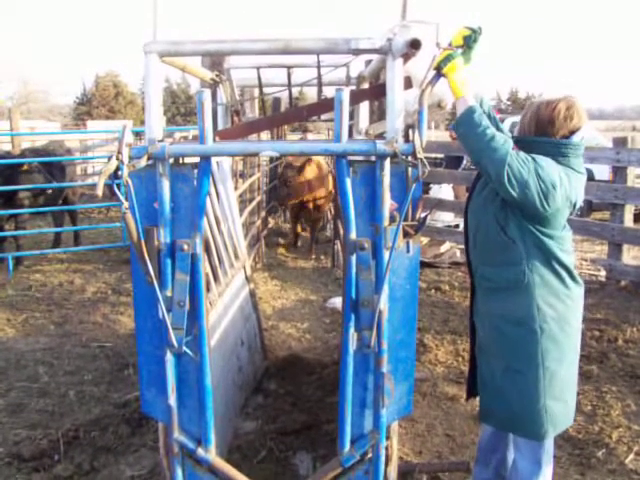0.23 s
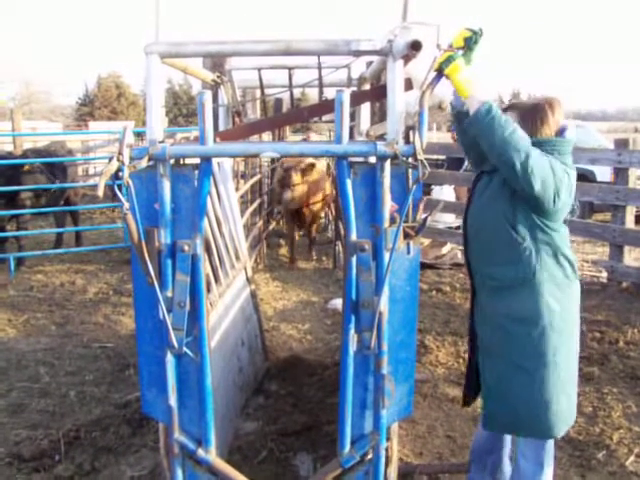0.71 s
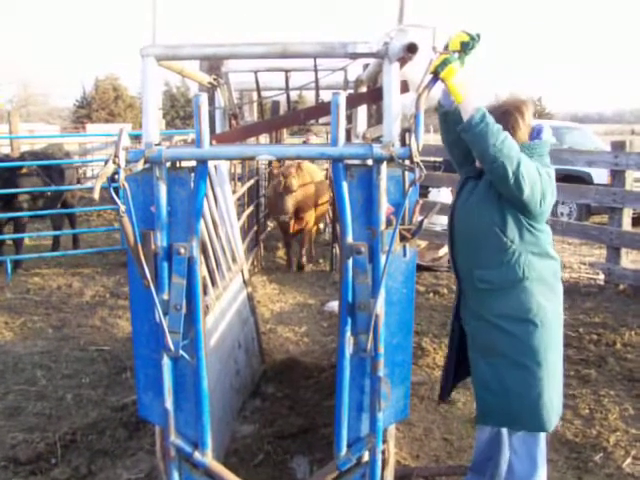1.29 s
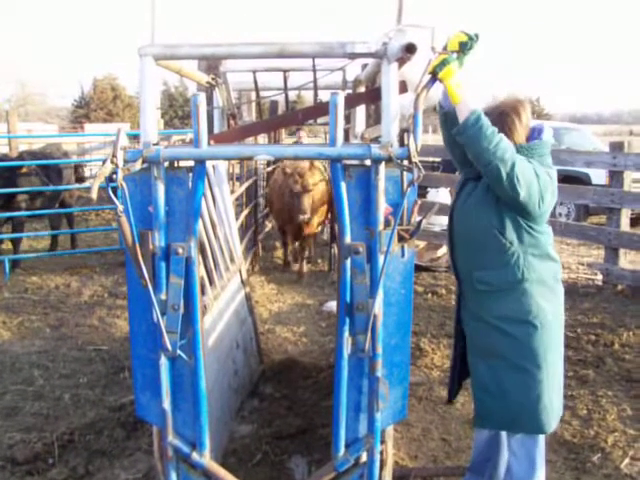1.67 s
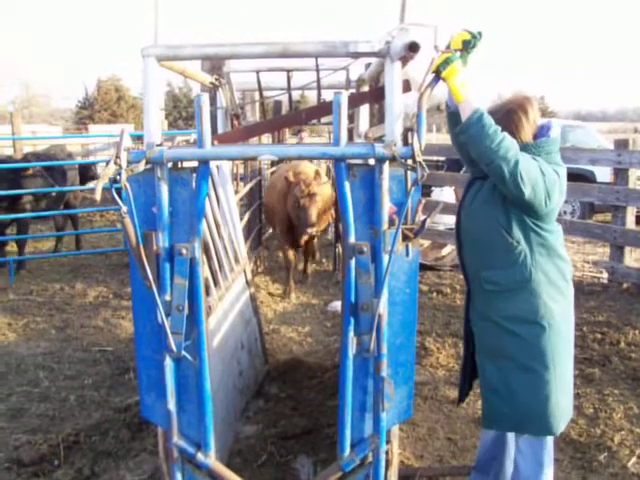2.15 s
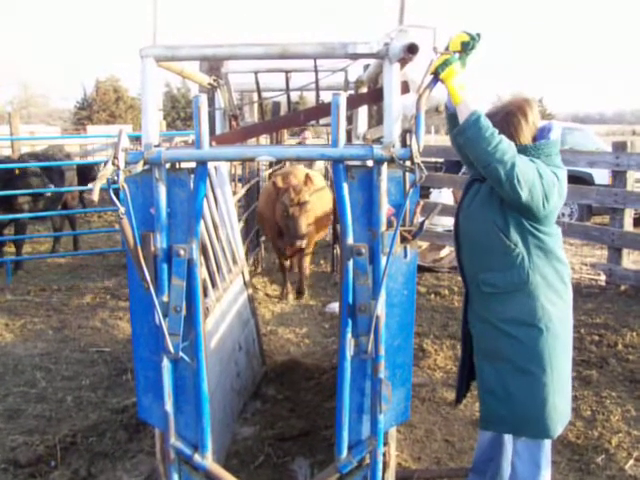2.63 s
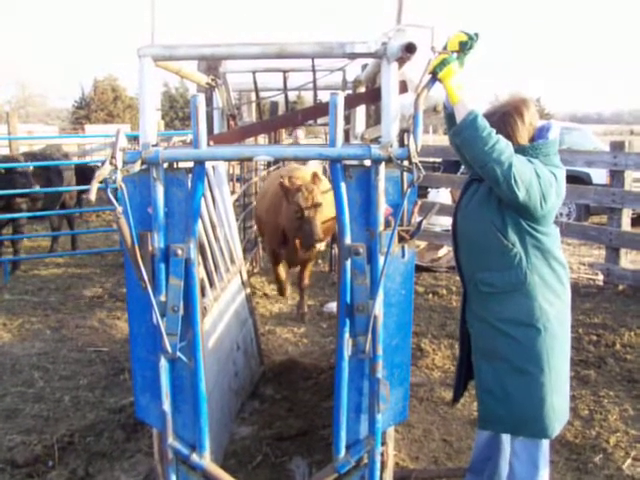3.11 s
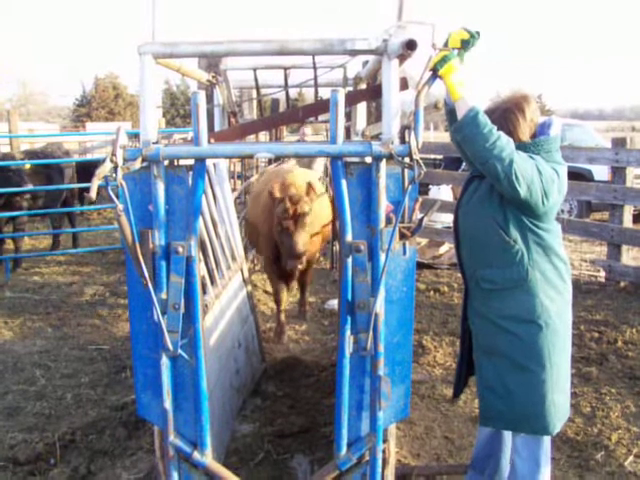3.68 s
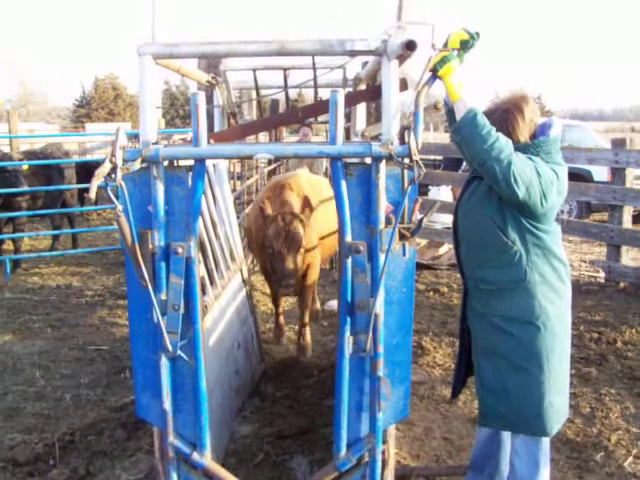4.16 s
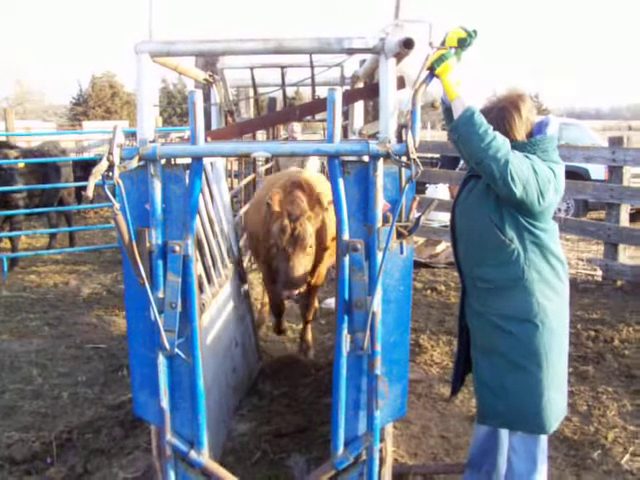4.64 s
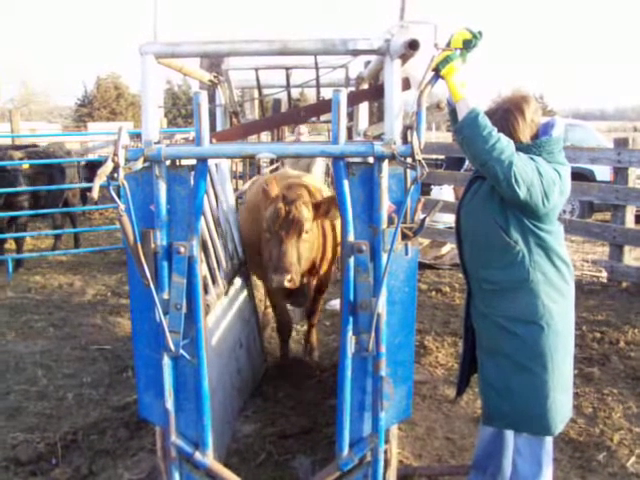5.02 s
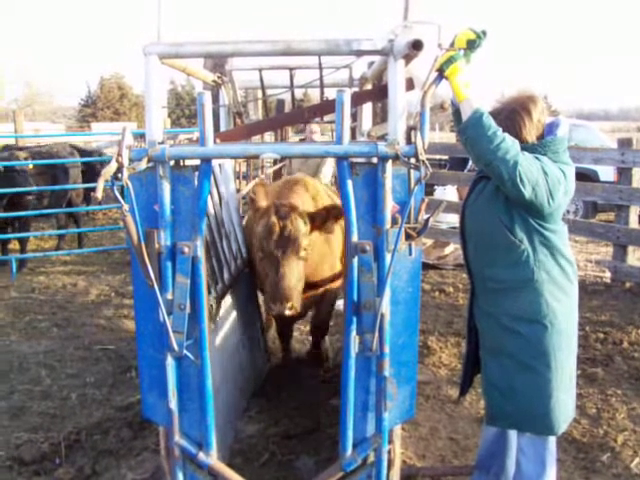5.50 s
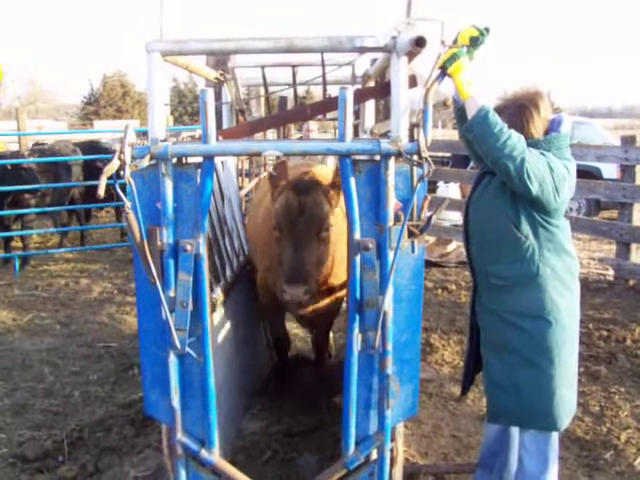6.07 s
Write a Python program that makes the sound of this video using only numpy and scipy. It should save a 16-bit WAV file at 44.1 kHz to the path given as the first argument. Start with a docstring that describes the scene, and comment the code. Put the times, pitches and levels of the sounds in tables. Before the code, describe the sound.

Cattle calling at a steel chute outdoors, dry with short scattered yard echoes. A low pulsing growl rises slowly to a nasal, raspy moo, then breaks suddenly into a clear high cry that slides down. Light latch clinks dot the call. Then sharp cracks with dull thuds and panel rattle hit the chute, overlapping a rough second moo with an arched pitch. A wind gust buffets the microphone late, and sharp clanks finish.

```python
"""Metal parts clink under a faint outdoor hiss and light wind; then cattle bawl as a cow enters a steel chute.
A long call climbs from a creaky growl to a moo, breaks into a high register and falls; a second moo follows.
Each voice is a harmonic series and puffs of breath noise filtered by throat resonances, with a nasal hum.
Chute blows are filtered snaps and noise bursts that excite the frame's decaying modes.
Hiss and wind are shaped noise, distant squeaks are gliding sines, and sparse echoes make the yard."""
import sys
import numpy as np
from scipy import signal
from scipy.fft import irfft
from scipy.io import wavfile
from scipy.ndimage import uniform_filter1d

SR = 44100
rng = np.random.default_rng(int(sys.argv[2]) if len(sys.argv) > 2 else 0)


def materialize(psi):
    """Save the field psi as 16-bit PCM at rate SR to the path in sys.argv[1].

    A 1-D psi becomes a single channel; in a 2-D psi each row is a channel.
    """
    bounded = np.clip(np.atleast_2d(psi).T, -1, 1)
    quanta = np.round(bounded * 32767).astype(np.int16)
    wavfile.write(sys.argv[1], SR, quanta)


N = 276948
EDGE_HZ = 8600  # upper band limit of the sound
SIZE = 8192  # samples in a filter's spectrum
GRID = np.fft.rfftfreq(SIZE, 1 / SR)  # Hz
TIME = np.arange(N) / SR  # s

# outdoor hiss, relative spectral density: hz, level_db
AIR = [(25, -14.5), (70, -4), (150, -6.5), (230, -10.5), (620, -13.5), (1200, -23), (2200, -22.5),
       (3650, -18), (4900, -23), (8100, -30.5), (8800, -61.5)]
AIR_DB, CALM_DB = -51.5, -61.5  # mean levels of the hiss and of the wind between gusts
# gusts of wind on the microphone: centre_s, width_s, rise_db
GUSTS = [(1.7, 0.88, 7), (5.64, 0.48, 17)]
# decay of the yard's scattered sound: hz, t60_s
YARD_T60 = [(100, 0.72), (1000, 0.12), (4000, 0.42), (8000, 0.023)]
# thin distant squeaks, direct sound: start_s, length_s, pitch_hz, peak_db
SQUEAKS = [(0.038, 0.051, 5600, -55), (0.6, 0.076, 4680, -60)]

# modes of the steel frame, relative levels: mode_hz, level_db, t60_s
STEEL = [(254, -2.5, 0.11), (396, 6.5, 0.02), (624, -22, 1.0), (1000, -5.5, 0.047), (1463, -7, .25),
         (1796, -6, 0.21), (2420, -18, 0.44), (3200, -16, 0.44), (3740, -24, .15), (4044, -11.5, 0.28),
         (4963, -10, .3)]
RING_DB, CONTACT_SKIRT_DB = -44, -9  # scale of the frame's ring; skirt beside a contact's spectral peak
# the cow bumps the chute: start_s, crack_db, crack_hz, crack_spread_octaves,
# thud_db, thud_hz, thud_delay_s, rattle_db (peak levels)
BLOWS = [(4.886, -7.5, 4150, 0.17, -6, 410, 0.0079, -26), (5.159, -24.5, 2630, 1.48, -29, 131, 0.0076, -43),
         (5.196, -28.5, 3000, 1.1, -42, 200, 0.0013, -47), (5.544, -7.5, 1700, 1.03, -19.5, 500, .009, -34),
         (5.899, -18, 980, 1.3, -31, 500, 0.0071, -27.5), (6.087, -3.5, 1040, 0.2, -10, 333, 0.00097, -23)]
BODY_DB = -10.5  # the frame's broad knock, relative to each crack
REBOUND_S, REBOUND_GROWTH, REBOUND_LOSS_DB = .022, 2.7, -2  # first delay, delay ratio, level step
# clinks of latches and chains: start_s, peak_db, centre_hz, spread_octaves, t60_s
CLINKS = [(.027, -38.5, 2700, .69, 0.027), (.047, -40.5, 3800, 0.15, 0.42),
          (.295, -35.5, 5000, 0.25, 0.089), (.316, -33.5, 4800, 0.36, 0.12),
          (1.023, -23.5, 5040, 0.78, 0.019), (1.57, -21, 4700, 0.42, .012), (2.548, -26, 3000, 1.05, .012),
          (4.366, -31, 3330, 0.27, .03), (4.963, -30, 6400, 0.36, .03), (5.426, -26, 6660, 0.098, 0.019),
          (6.241, -13, 4770, 0.36, .09), (6.245, -5.5, 3530, 0.12, 0.13), (6.27, -11.5, 3600, 0.55, .09)]

# contours of the climbing moo and the high bawl, before each voice's own offsets:
# time_s, pitch_hz, tone_db (open mouth), rasp_db
MOO = [(1.74, 83.2, -49, -39), (1.854, 96.6, -44.5, -31.5), (1.944, 104.6, -44.5, -31),
       (2.054, 110.6, -46, -40), (2.252, 116.4, -46, -43.5), (2.578, 121.3, -45.5, -41),
       (2.826, 129.4, -44.5, -37.5), (3.168, 144.7, -42, -33), (3.52, 187.5, -38, -39.5),
       (3.586, 189.6, -37, -42.5), (3.658, 199.2, -37.5, -42), (3.72, 223, -39.5, -42.5)]
BAWL = [(3.708, 361, -38.5, -44.5), (3.768, 381, -26.5, -39), (3.852, 388, -27.5, -37.5),
        (3.962, 374.4, -23.5, -39.5), (4.044, 357.5, -25, -37.5), (4.096, 338.2, -27, -37.5),
        (4.112, 309.3, -30, -34.5), (4.144, 254, -33, -40), (4.192, 190.2, -37.5, -48.5),
        (4.225, 185, -51, -51)]
# throat and nose resonances of each register, before stretching: centre_hz, half_width_hz, level_db
GROWL_THROAT = [(680, 135, -5.5), (1360, 250, -10.5), (2080, 69, -21), (2770, 51, -5.5), (3420, 510, -17.5),
                (4044, 185, -3), (5000, 160, -18), (5860, 440, -18)]
MOO_THROAT = [(757, 65, -11), (1130, 240, -10), (1522, 147, -6), (1911, 109, -8.5), (3064, 272, -5.5),
              (3740, 225, 2.5), (4160, 94, -5.5), (5030, 280, -10), (5746, 720, -14.5), (400, 300, -21.5)]
BAWL_THROAT = [(752, 80, -2), (1060, 64, -0.5), (1336, 140, -8), (1740, 207, -10), (2603, 41, -22),
               (3420, 580, -15.5), (3980, 88, -15.5), (5060, 820, -25)]
CROAK_THROAT = [(663, 110, 6.5), (1370, 460, 0.5), (2363, 80, 0.5), (3000, 120, -6), (3400, 240, -10),
                (4000, 180, -5), (5260, 1600, -19.5)]
SECOND_THROAT = [(756, 70, 1), (1056, 140, 2), (1429, 54, 0.5), (1700, 95, 4.5), (2434, 87, -9),
                 (3182, 77, -3), (3680, 97, -2), (5200, 103, -9), (2800, 3500, -17)]
# catches of the throat in the croak, each a jump that dies away: time_s, jump_db
CATCHES = [(5.257, 4), (5.293, 14), (5.362, 4)]
CATCH_S = 0.019  # decay time of a catch
# hum of the two lowest harmonics through the nose, before each voice's offsets: hz, level_db
NOSE = [(95, -8), (120, 3), (150, -3), (180, 5.5), (205, 11), (280, 10), (360, -15.5), (450, -33)]
HUM_TRADE = 0.63  # dB of hum lost for each dB that the rasp gains on the tone as the mouth opens
SNAP_HZ = 4900  # a sharper snap of the folds lifts the spectrum above this
GROUND_S, GROUND_DB = 0.002207, -20.5  # delay and level of the ground echo
SMEAR_S = .0014  # how much later EDGE_HZ leaves the long muzzle than the lowest frequencies


def gain_of(db):
    """Logarithmic level: decibels to amplitude ratio."""
    return 10 ** (np.asarray(db) / 20)


def evened(x):
    """Normalisation: scales a signal to rms 1."""
    return x / np.sqrt(np.mean(x ** 2) + 1e-20)


def steadied(x, size=1300):
    """Envelope flattening: division by the running rms holds it near 1."""
    power = uniform_filter1d(uniform_filter1d(x ** 2, size), size)
    return x / np.sqrt(abs(power) + 1e-14)


def read(points, hz):
    """Spectral interpolation: joins a table's points on a log-frequency axis."""
    f, value = np.transpose(points)
    return np.interp(np.log(hz + 1), np.log(f + 1), value)


def follow(rows, t):
    """Contour interpolation: every column of a timed table at times t."""
    s, *columns = np.transpose(rows)
    return [np.interp(t, s, c) for c in columns]


def add(mix, s, sound):
    """Superposition: adds a sound to the mix from time s."""
    part = mix[round(s * SR):][:len(sound)]
    part += sound[:len(part)]


def cut(x, hz, kind, order=4):
    """Butterworth filtering: low-pass or high-pass."""
    return signal.sosfilt(signal.butter(order, hz, kind, fs=SR, output="sos"), x)


def drift(length, hz):
    """Random modulation: noise low-passed at hz, rms 1."""
    return evened(cut(rng.standard_normal(length + SIZE), hz, "low", order=2)[SIZE:])


def causal(gain):
    """Minimum phase: the response on GRID of a body with this gain that rings only after it is struck."""
    log_gain = np.log(np.maximum(gain, 1e-5))
    both_sides = np.r_[log_gain, log_gain[-2:0:-1]]
    return np.exp(np.conj(signal.hilbert(both_sides)))[:len(GRID)]


def colour(x, response):
    """Convolution: passes x through a body with this response on GRID."""
    return signal.fftconvolve(x, irfft(response)[:SIZE // 2])[:len(x)]


def since(t, fade_s):
    """Exponential relaxation: falls from 1 at the start of a call."""
    return np.exp((t[0] - t) / fade_s)


def towards(t, swell_s):
    """Exponential growth: climbs to 1 at the end of a call."""
    return np.exp((t - t[-1]) / swell_s)


def yard(x):
    """Multiple scattering: rails, boards and ground return sparse echoes that die at frequency-dependent rates."""
    t = np.arange(SR // 2) / SR
    sparse = rng.random(len(t)) < 1500 / SR
    early = 1 + 7.0 * np.exp(-t / 0.0045)
    taps = rng.standard_normal(len(t)) * sparse * (t > .002) * early
    hz, s, z = signal.stft(taps, SR, nperseg=256)
    decay = gain_of(-60 * s / read(YARD_T60, hz)[:, None])
    tail = signal.istft(z * decay, SR, nperseg=256)[1]
    return signal.fftconvolve(x, tail / np.linalg.norm(tail))[:len(x)]


def outdoors():
    """Broadband turbulence: a faintly wavering hiss, and lumpy low wind noise on the microphone."""
    air = evened(colour(rng.standard_normal(N), causal(gain_of(read(AIR, GRID)))))
    rumble = cut(rng.standard_normal(N), 100, "low", order=2)
    wind = evened(cut(rumble, 35, "high", order=2))
    wind_db = CALM_DB + sum(db * np.exp(-((TIME - s) / width) ** 2) for s, width, db in GUSTS)
    air_gain = gain_of(AIR_DB + 0.22 * drift(N, 16))
    wind_gain = gain_of(wind_db + 4.6 * drift(N, 21))
    return air_gain * air + wind_gain * wind


def squeaks():
    """Frequency modulation: short, slightly wavering whistles from far across the yard."""
    out = np.zeros(N)
    for s, length, hz, db in SQUEAKS:
        swell = np.hanning(round(length * SR))
        turns = np.cumsum(hz * (1 + 0.0033 * drift(len(swell), 80))) / SR
        add(out, s, gain_of(db) * swell * np.sin(2 * np.pi * turns))
    return out + .5 * yard(out)


def hit(peak_db, hz, spread, t60, clatter):
    """Impact excitation: a snap and a decaying clatter, coloured by the part that is struck."""
    t, clatter = np.arange(SR // 4) / SR, np.clip(clatter, 0, 1)
    rattle = rng.standard_normal(len(t)) * gain_of(-60 * t / t60)
    force = (1 - clatter) * (t == 0) + clatter * rattle / np.linalg.norm(rattle)
    octaves = np.log2((GRID + 1) / hz)
    peak = np.exp(-.5 * (octaves / spread) ** 2)
    skirt = gain_of(CONTACT_SKIRT_DB) / (1 + octaves ** 4)
    blow = colour(force, causal(peak + skirt))
    return gain_of(peak_db) * blow / abs(blow).max()


def frame_ring():
    """Modal vibration: the steel frame's impulse response is a sum of decaying sines."""
    t = np.arange(SR) / SR
    return sum(gain_of(db - 60 * t / t60) * np.sin(2 * np.pi * hz * t) for hz, db, t60 in STEEL)


def chute():
    """Impact and resonance: blows crack, thud and rattle, small parts clink, and the frame rings on."""
    out = np.zeros(N)
    for s, crack_db, hz, spread, thud_db, thud_hz, delay_s, rattle_db in BLOWS:
        add(out, s, hit(crack_db, hz, spread, t60=0.027, clatter=0.48))
        add(out, s, hit(crack_db + BODY_DB, hz=900, spread=1.35, t60=.04, clatter=.7))
        add(out, s + delay_s, hit(thud_db, thud_hz, spread=1.32, t60=.036, clatter=0.14))
        for k in range(2):  # loose panels rattle twice after a blow
            rebound_s = s + REBOUND_S * REBOUND_GROWTH ** k
            rebound_db = rattle_db + k * REBOUND_LOSS_DB
            add(out, rebound_s, hit(rebound_db, hz=1450, spread=1.22, t60=0.11, clatter=0.83))
    for s, db, hz, spread, t60 in CLINKS:
        # parts that clatter longer have less snap
        add(out, s, hit(db, hz, spread, t60, clatter=0.51 + 3 * t60))
    out = out + gain_of(RING_DB) * signal.fftconvolve(out, frame_ring())[:N]
    return cut(out + gain_of(-13) * yard(out), 5960, "low", order=3)


def throat_response(throat):
    """Resonance and dispersion: summed throat peaks, with high frequencies leaving the muzzle later."""
    gain = sum(gain_of(db) / (1 + ((GRID - f) / width) ** 2) ** 1.454 for f, width, db in throat)
    # each snap spreads into a short chirp
    return causal(gain) * np.exp(-1j * np.pi * SMEAR_S * GRID ** 2 / EDGE_HZ)


def call(t, hz, throat, tone_db, rasp_db, hum_db, octave_db, rough, jitter, stretch, snap_db, top_hz,
         shimmer, rise_s, fall_s):
    """Source and filter: the folds snap and puff air each cycle into the throat; stretch scales the snaps' resonances."""
    rough = np.clip(rough, 0, 1)
    hz = hz * np.exp(jitter * drift(len(t), 50.6))
    turns = np.cumsum(hz) / SR
    response = throat_response(throat)
    cycle, partial, folds, hum = np.exp(2j * np.pi * turns), 1, 0, 0
    for k in range(1, int(EDGE_HZ / hz.min())):
        partial = partial * cycle
        place = np.rint(k * hz / stretch / GRID[1]).astype(int)
        folds = folds + (partial * response[np.minimum(place, len(GRID) - 1)]).real
        if k <= 2:  # the two lowest harmonics hum through the nose
            nose_gain = gain_of(read(NOSE, k * hz) + (k - 1) * octave_db)
            hum = hum - np.sqrt(2) * partial.real * nose_gain

    puff_shape = .5 + np.exp(-(turns % 1) / 1.3)  # air flow within each cycle
    puffs = colour(puff_shape * rng.standard_normal(len(t)), response)
    clean = steadied(folds) * (1 + shimmer * drift(len(t), 61))
    voice = (1 - rough) * clean + rough * evened(puffs)
    voice = voice + gain_of(GROUND_DB) * np.interp(t - GROUND_S, t, voice)  # the bounce off the ground
    treble = np.convolve(voice, signal.firwin(65, SNAP_HZ, pass_zero=False, fs=SR), "same")
    voice = voice + (gain_of(snap_db) - 1) * treble

    # the open-mouth tone and the rasp above it are levelled separately
    mouth = steadied(cut(cut(voice, 380, "high"), 2470, "low", order=6))
    buzz = steadied(cut(cut(voice, 2470, "high", order=6), top_hz, "low", order=14))
    hum_gain = gain_of(hum_db - HUM_TRADE * (rasp_db - tone_db))
    sound = gain_of(tone_db) * (mouth + hum_gain * hum) + gain_of(rasp_db) * buzz
    ramps = np.minimum((t - t[0]) / rise_s, (t[-1] - t) / fall_s)
    return t[0], sound * np.clip(ramps, 0, 1)


def growl(start_s=1.02, end_s=1.735, first_hz=71.9, settled_hz=78.6, settle_s=.27, tone_db=-54,
          first_rasp_db=-38, fade_db_per_s=-11):
    """Slow fold vibration: a creak that starts with a hum, settles in pitch and loses its rasp."""
    t = np.arange(start_s, end_s, 1 / SR)
    fresh = since(t, settle_s)
    hz = settled_hz + (first_hz - settled_hz) * fresh
    rasp_db = first_rasp_db + fade_db_per_s * (t - start_s)
    return call(t, hz, GROWL_THROAT, tone_db, rasp_db,
                hum_db=-3 + 30 * fresh + 12 * towards(t, .07), octave_db=-2.5, rough=0.19, jitter=.009,
                stretch=1.003 + .04 * fresh, snap_db=1.5 - 8 * fresh,
                top_hz=6700, shimmer=.071, rise_s=0.1, fall_s=0.0084)


def moo(easy_hz=120, strained_hz=200, open_s=0.29, linger_s=.022):
    """Fold tension: after a rough, tight start the climbing voice gets cleaner and darker until it cracks."""
    t = np.arange(MOO[0][0], MOO[-1][0] + linger_s, 1 / SR)  # the low voice lingers under the break
    hz, tone_db, rasp_db = follow(MOO, t)
    strain = np.clip((hz - easy_hz) / (strained_hz - easy_hz), 0, 1)
    tight = since(t, open_s)
    unsteady = since(t, 0.044) + towards(t, .02)
    return call(t, hz, MOO_THROAT, tone_db - 3.5 * unsteady, rasp_db + 2.3 * tight - 4 * unsteady,
                hum_db=.5, octave_db=-5, rough=.06 + .13 * (1 - strain) ** 3 + .1 * unsteady,
                jitter=.0012 + 0.022 * unsteady, stretch=0.961 + 0.093 * tight + 0.066 * strain ** 3,
                snap_db=8.5 - 28 * tight - 13.2 * strain ** 0.35,
                top_hz=7230, shimmer=.04, rise_s=.003, fall_s=0.037)


def bawl(held_hz=350, slack_hz=190):
    """Register break: the high voice is clean while the pitch holds and turns ragged as the folds go slack."""
    t = np.arange(BAWL[0][0], BAWL[-1][0], 1 / SR)
    hz, tone_db, rasp_db = follow(BAWL, t)
    slack = np.clip((held_hz - hz) / (held_hz - slack_hz), 0, 1)
    crack = since(t, 0.027)
    return call(t, hz, BAWL_THROAT, tone_db - 1, rasp_db - 0.9, hum_db=-11 + 2.5 * slack, octave_db=-10,
                rough=.12 + .07 * slack + .15 * crack, jitter=.003 + .06 * slack ** 8 + 0.0287 * crack,
                stretch=1.01 - 0.054 * slack, snap_db=3 - 11 * slack,
                top_hz=5400, shimmer=0.025, rise_s=.014, fall_s=0.013)


def croak(start_s=5.25, end_s=5.42, first_hz=89.9, climb_hz_per_s=295, first_tone_db=-46, first_rasp_db=-43,
          swell_db_per_s=65):
    """Irregular fold vibration: the second call starts as a rattle that swells, speeds up and steadies."""
    t = np.arange(start_s, end_s, 1 / SR)
    age, loose = t - start_s, since(t, 0.18)
    catch_db = sum(db * (t > s) * np.exp(-abs(t - s) / CATCH_S) for s, db in CATCHES)
    swell_db = swell_db_per_s * age
    return call(t, first_hz + climb_hz_per_s * age, CROAK_THROAT,
                first_tone_db + swell_db + 0.34 * catch_db, first_rasp_db + swell_db + catch_db,
                hum_db=-11.5, octave_db=-7.5, rough=0.63 * loose, jitter=.19 * loose,
                stretch=1.03 - .11 * loose, snap_db=-5.0,
                top_hz=6740, shimmer=0.15, rise_s=0.0032, fall_s=.024)


def second_moo(start_s=5.38, end_s=6.29, crest_s=5.96, crest_hz=179.6, sag_hz_per_s2=137):
    """Pitch arch: a parabola of fold rate, with the tone strongest at its crest and roughness easing."""
    t = np.arange(start_s, end_s, 1 / SR)
    sag_hz, croaky = sag_hz_per_s2 * (t - crest_s) ** 2, since(t, .1)
    sag = sag_hz / sag_hz.max()
    return call(t, crest_hz - sag_hz, SECOND_THROAT, tone_db=-30.0 - 5.1 * sag ** 2,
                rasp_db=-35 + 6.7 * since(t, 0.35) - 6.9 * sag ** 3,
                hum_db=-4.5, octave_db=-12, rough=0.11 + 0.26 * croaky, jitter=0.0019 + .1 * croaky ** 4,
                stretch=.98 + 0.041 * since(t, 0.29), snap_db=-1.5 - 6 * croaky,
                top_hz=5600, shimmer=.029, rise_s=0.059, fall_s=.0047)


def cattle():
    """Voice registers in succession: the long call, then the croak and second moo, with yard echoes."""
    out = np.zeros(N)
    for voice in (growl, moo, bawl, croak, second_moo):
        add(out, *voice())
    return out + gain_of(-12) * cut(yard(out), 400, "high", order=2)


def scene():
    """Superposition: open air, squeaks, chute and cattle at one microphone."""
    return (outdoors() + squeaks() + chute() + cattle())[None]


def record(dry):
    """Band limitation: a linear-phase low-pass at EDGE_HZ."""
    low_pass = signal.firwin(255, EDGE_HZ, window=("kaiser", 9), fs=SR)
    return signal.oaconvolve(dry, low_pass[None], "same")


dry = scene()
out = record(dry)
materialize(out)
```